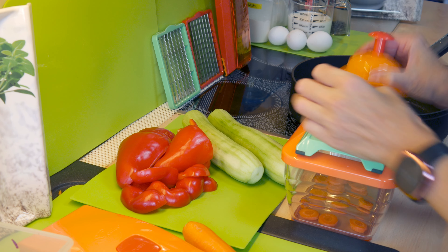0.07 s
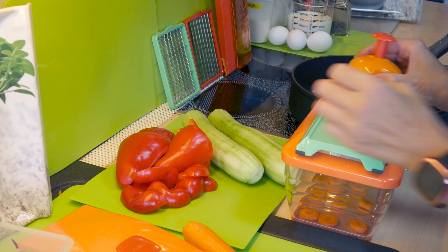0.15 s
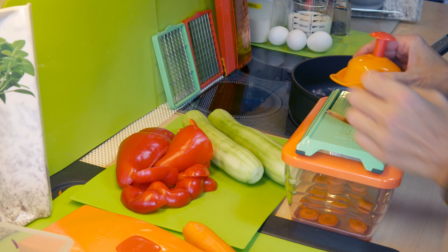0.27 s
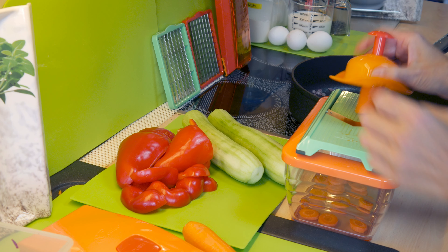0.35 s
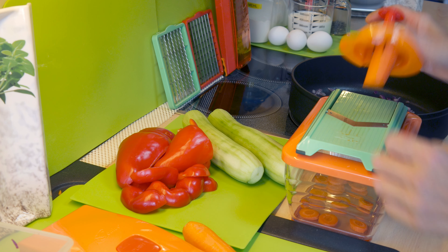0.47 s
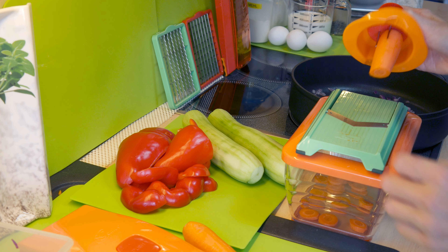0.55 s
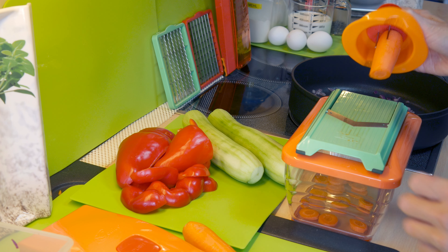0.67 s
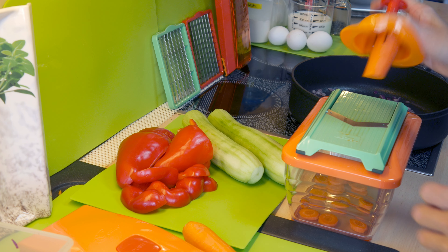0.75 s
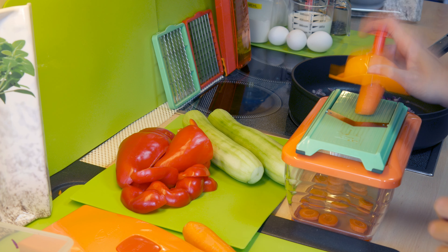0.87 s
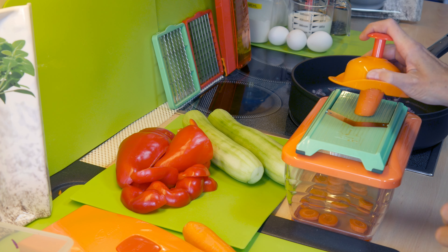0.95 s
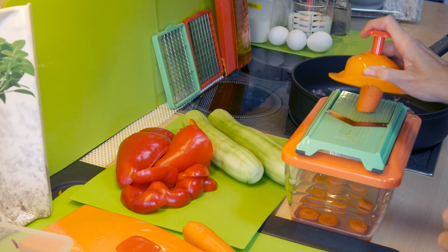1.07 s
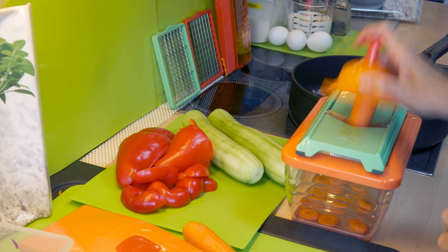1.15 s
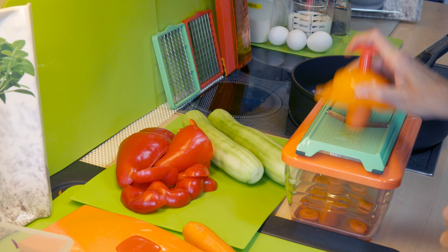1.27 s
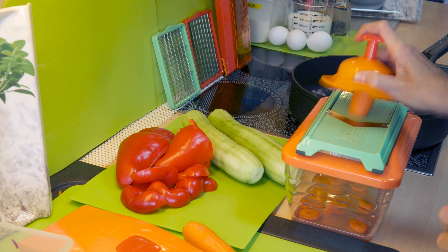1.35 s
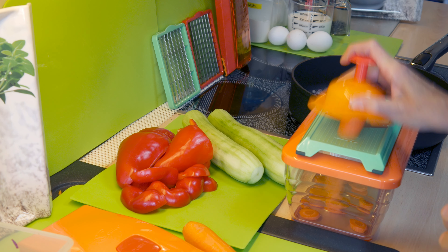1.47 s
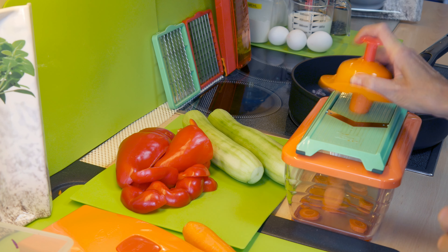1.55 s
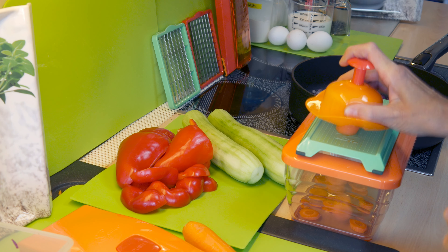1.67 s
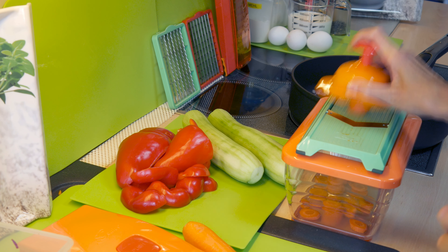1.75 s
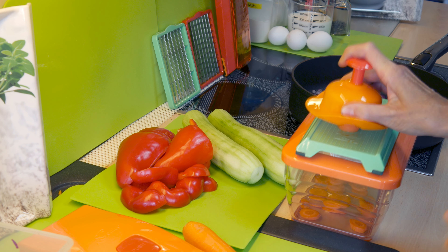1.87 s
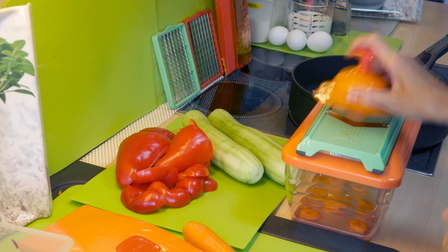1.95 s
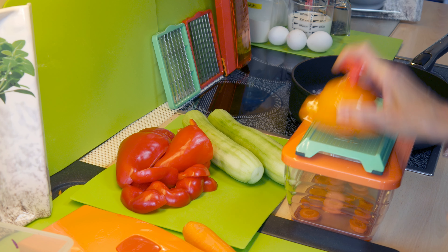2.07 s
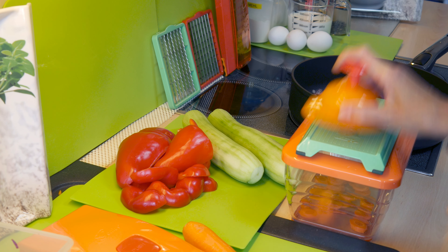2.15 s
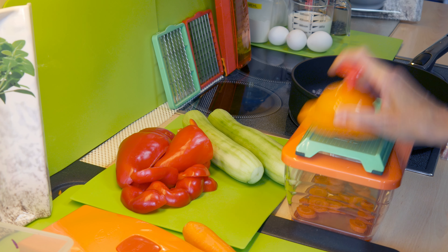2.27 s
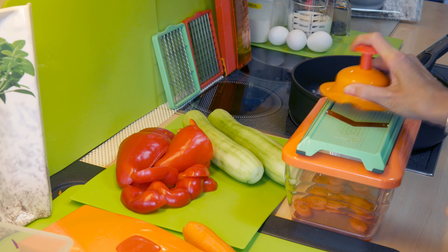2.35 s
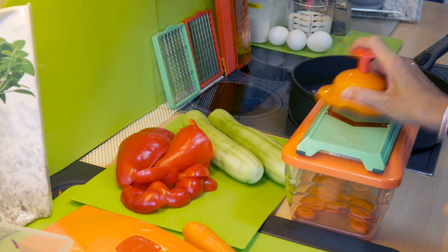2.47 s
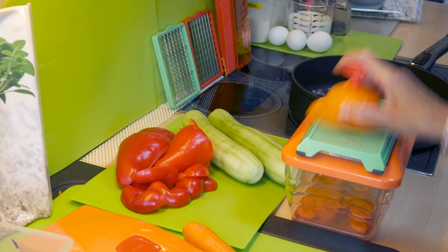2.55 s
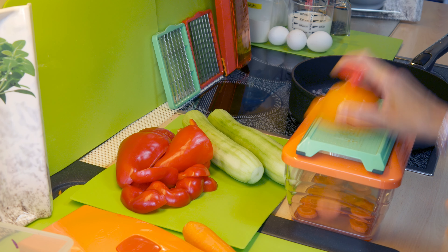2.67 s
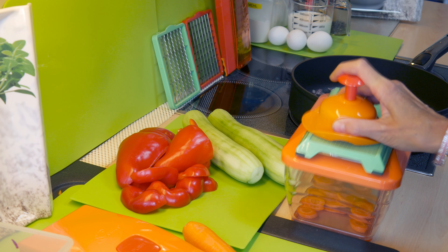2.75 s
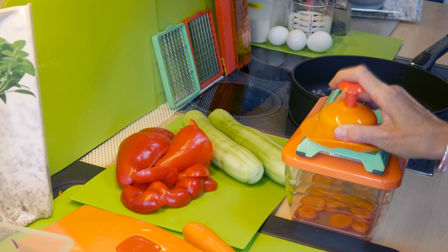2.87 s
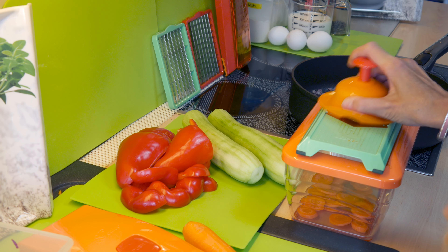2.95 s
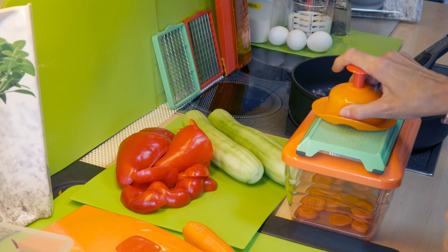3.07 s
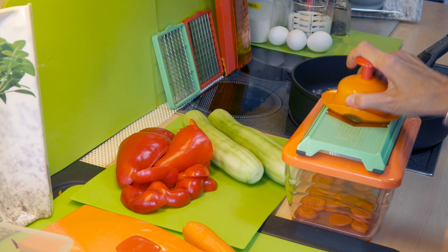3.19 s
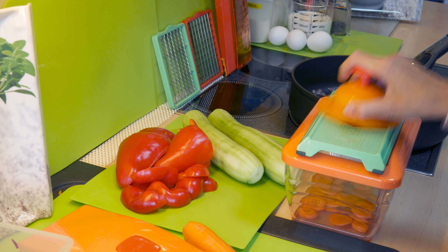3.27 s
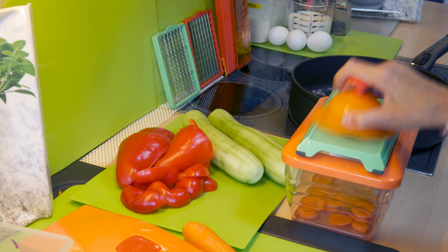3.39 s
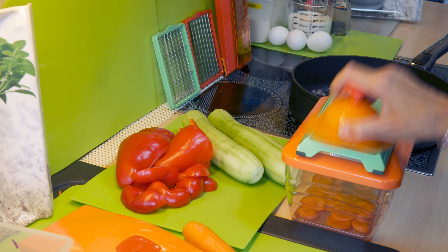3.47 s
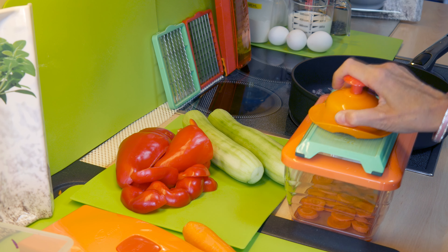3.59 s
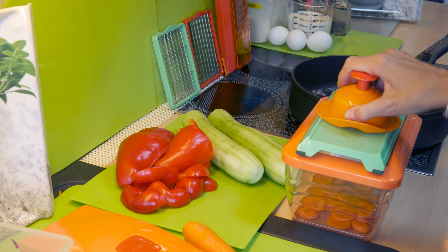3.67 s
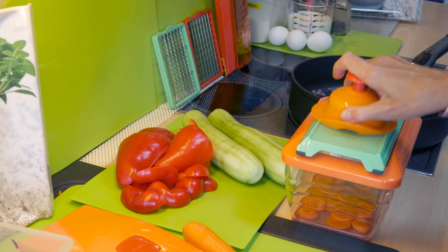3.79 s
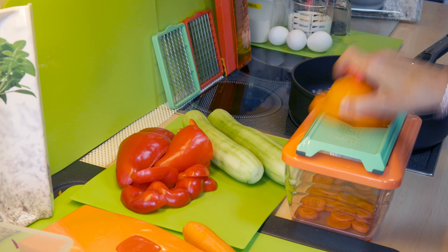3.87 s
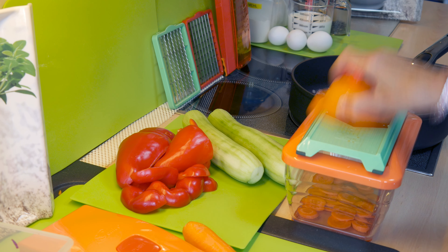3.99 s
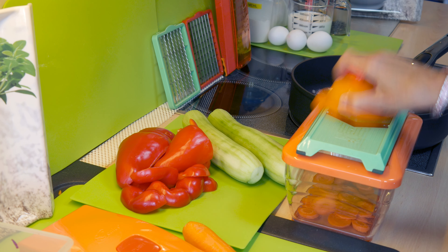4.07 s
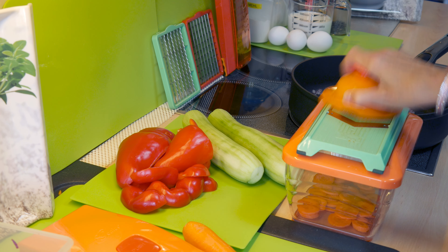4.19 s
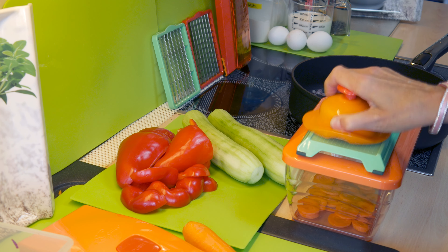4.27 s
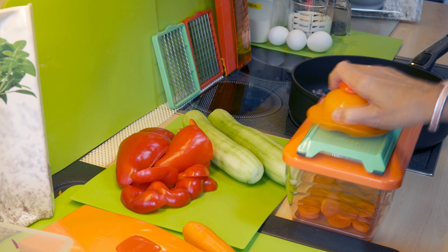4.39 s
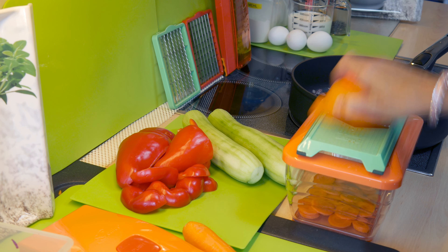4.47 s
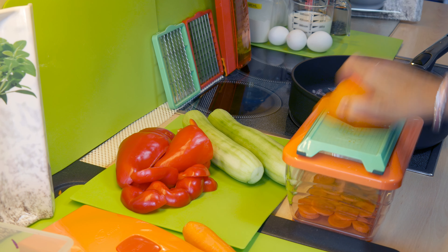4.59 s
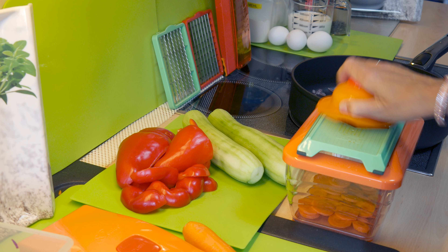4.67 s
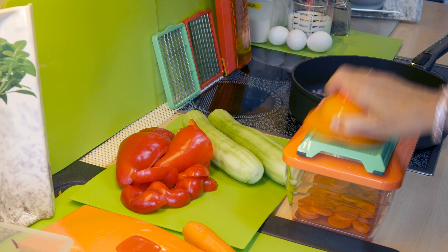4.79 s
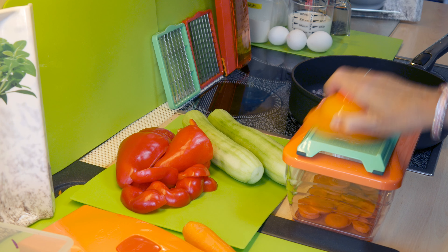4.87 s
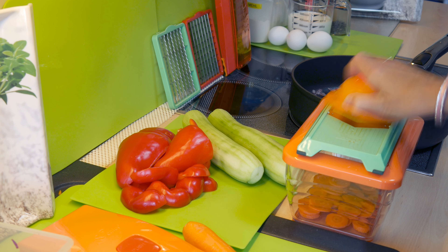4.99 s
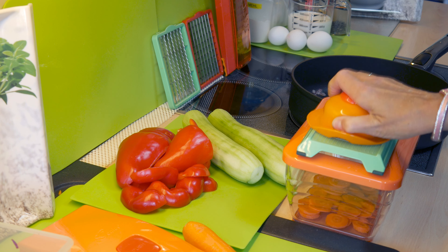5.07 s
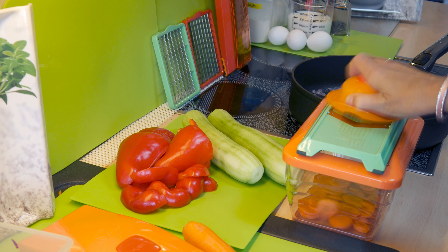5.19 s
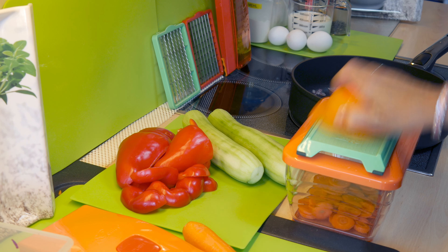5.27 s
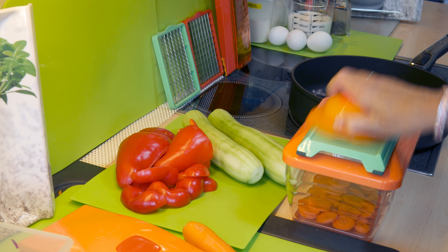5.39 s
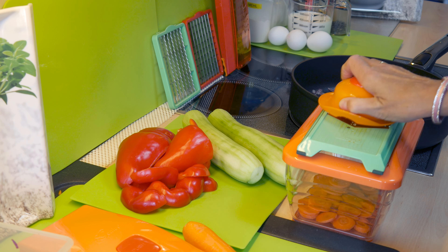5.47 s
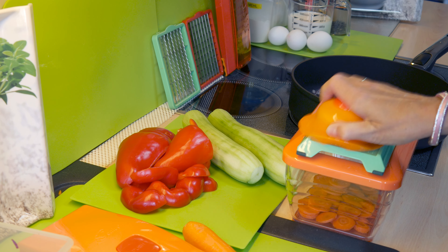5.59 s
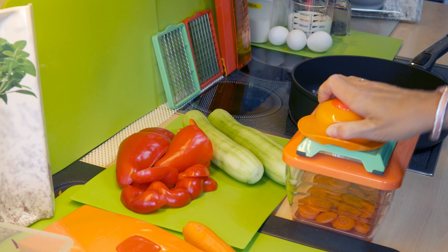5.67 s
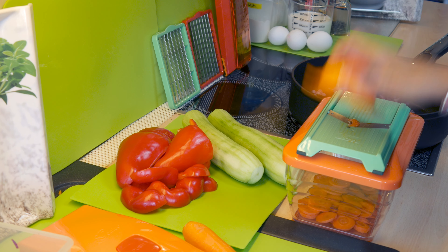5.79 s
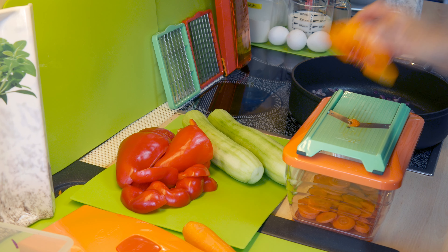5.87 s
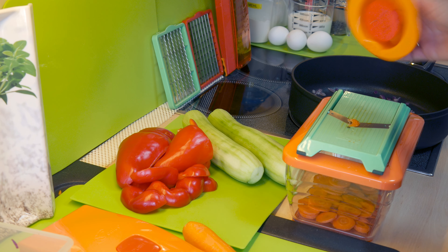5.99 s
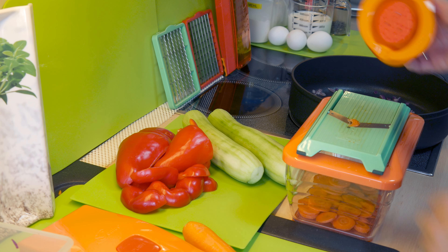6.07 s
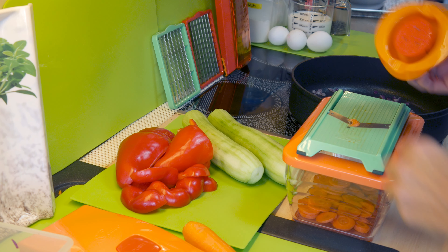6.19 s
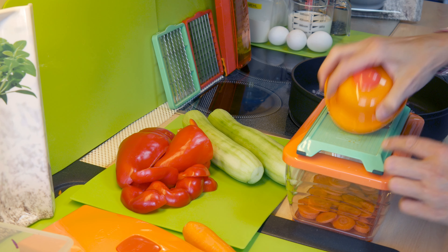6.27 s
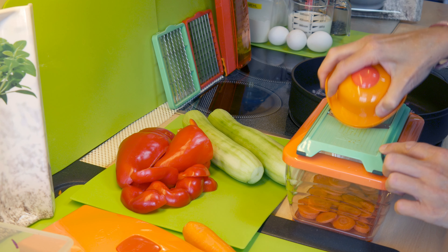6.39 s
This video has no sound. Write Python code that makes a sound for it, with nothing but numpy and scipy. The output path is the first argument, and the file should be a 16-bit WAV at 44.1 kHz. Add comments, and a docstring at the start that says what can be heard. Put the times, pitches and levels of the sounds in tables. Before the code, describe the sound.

Steady hiss and a short room reverberation surround a carrot being sliced by hand on plastic. After loose knocks come five strong cuts, crisp at the blade and booming in the box, with little wet squeaks. Then quick back-and-forth rasps turn duller and more spread out, with bumps between them. The strokes thin out; hard plastic rattles, and the holder knocks down again at the end.

```python
"""A carrot in a plastic holder is pushed to and fro over a mandoline on a plastic box, in a small kitchen.
Filtered grain noise makes each pass rasp at the blade; after a hard stroke a bright burst snaps the slice off.
The sled rubs, bumps and squeaks, and moving resonances make the hollow box boom; hard parts clack early and late.
Five hard strokes give way to quicker ones as the stub wears down, over a steady hiss.
During most of the quick strokes the middle of the stereo image is turned down: they sound softer and wider."""
import sys
import numpy as np
from scipy import signal
from scipy.fft import rfft, irfft
from scipy.io import wavfile
from scipy.ndimage import uniform_filter1d

SR = 44100
rng = np.random.default_rng(int(sys.argv[2]) if len(sys.argv) > 2 else 0)


def generate_wav(signal):
    """Clip the signal to [-1, 1] and save it as 16-bit WAV at the path in sys.argv[1]."""
    frames = np.transpose(np.atleast_2d(signal))
    scaled = np.clip(frames, -1, 1) * 32767
    pcm = np.round(scaled).astype(np.int16)
    wavfile.write(sys.argv[1], SR, pcm)


N = 283871
T = np.arange(N) / SR
SHORT = T[:SR // 2]  # time axis of a single event [s]


def amp(db):
    """Level to gain: 20 dB is a factor of ten in amplitude."""
    return 10 ** (np.asarray(db) / 20)


def evened(x):
    """Normalization by mean power: scales to rms 1."""
    return x / np.sqrt(np.mean(x ** 2) + 1e-20)


def peaked(x):
    """Normalization by short-time power: the loudest hundredth of a second gets rms 1."""
    power = uniform_filter1d(x ** 2, size=441)
    return x / np.sqrt(power.max() + 1e-20)


def read(points, hz):
    """Logarithmic frequency scale: interpolates a spectrum along log frequency."""
    f, value = np.transpose(points)
    return np.interp(np.log(hz + 1), np.log(f + 1), value)


def curves(rows):
    """Linear interpolation: each column of a time table, sample by sample."""
    s, *columns = np.transpose(rows)
    return [np.interp(T, s, c) for c in columns]


def add(mix, s, sound):
    """Superposition: mixes a sound in at time s."""
    part = mix[max(round(s * SR), 0):][:len(sound)]
    part += sound[:len(part)]


def response(spectrum, peaks=(), size=8192):
    """Minimum phase: a causal impulse response from a broad spectrum with resonances on top, by the cepstrum."""
    hz = np.fft.rfftfreq(size, 1 / SR)
    lift = 1 + sum((amp(db) ** 2 - 1) / (1 + (2 * (hz - f) / width) ** 2) for f, width, db in peaks)
    log_gain = np.log(amp(read(spectrum, hz))) + np.log(np.maximum(lift, 1e-2)) / 2
    cepstrum = irfft(log_gain)
    # fold the cepstrum onto positive time
    cepstrum[1:size // 2] *= 2
    cepstrum[size // 2 + 1:] = 0
    return irfft(np.exp(rfft(cepstrum)))[:size // 2]


def through(x, ring):
    """Linear filtering: convolves x with an impulse response."""
    return signal.oaconvolve(x, ring)[:len(x)]


def resonate(x, hz, width_hz):
    """Resonance by heterodyning: a one-pole smoother around a centre frequency that may move, gain 1 at its peak."""
    turn = np.exp(2j * np.pi * np.cumsum(hz * np.ones(N)) / SR)
    r = np.exp(-np.pi * width_hz / SR)
    return 2 * (turn * signal.lfilter([1 - r], [1, -r], x / turn + 1e-18)).real


def grains(count, per_s, spread_db):
    """Shot noise: random tiny fractures or slips of uneven size, rms 1."""
    size_db = spread_db * np.minimum(rng.exponential(1, count), 4)
    present = rng.random(count) < per_s / SR
    return evened(rng.standard_normal(count) * amp(size_db) * present)


def burst(rise, t60):
    """Impact transient: a quick flurry of contacts swells and dies exponentially."""
    flurry = grains(len(SHORT), per_s=9000, spread_db=-5.0)
    return flurry * (1 - np.exp(-SHORT / rise)) * amp(-60 * SHORT / t60)


def travelling(x, depth=1.0, delay=0.001228, swing=0.509, strokes_hz=4.4):
    """Comb interference: the contact moves along the plate, so the delay of its edge echo sways and colours the sound."""
    lag = delay * (1 + swing * np.sin(2 * np.pi * (strokes_hz * T + rng.random())))
    return (x + depth * np.interp(T - lag, T, x)) / np.sqrt(1 + depth ** 2)


HISS_DB = -43.5  # rms of the middle and reference for the sides, before the image is altered
# relative spectral density of the hiss: (frequency [Hz], level [dB])
HISS_SPECTRUM = [(18, -61), (30, -37), (86, -11), (141, -15), (645, -8), (981, -7.5), (1240, -9.5),
                 (1340, -8.5), (2660, -6), (2950, -4.5), (3360, -4.5), (6650, -2.5), (13200, -9),
                 (15800, -27)]
# sides of the hiss against its middle: (frequency [Hz], level [dB])
HISS_SIDE_SPECTRUM = [(60, -5), (180, 7), (550, -1), (1650, -5.5), (4970, -10), (15000, -6)]


def hiss():
    """Partial coherence: smooth, bright noise whose common middle is shared by both channels."""
    mid, side = (evened(through(v, response(HISS_SPECTRUM))) for v in rng.standard_normal((2, N)))
    side = through(side, response(HISS_SIDE_SPECTRUM))
    return amp(HISS_DB) * np.array([mid + side, mid - side])


ROOM_TAIL_DB, ROOM_SIDE_DB = -13.5, -21  # tail gains in the middle and in the sides
# reverberation time of the kitchen: (frequency [Hz], t60 [s])
ROOM_DECAY = [(100, 0.71), (400, 0.43), (1800, 0.58), (5000, 0.58), (14000, 0.044)]
# early echoes from worktop, wall and hob, by how they differ between the ears: (delay [s], relative gain [1])
EARLY_ECHOES = [(.0007, 0.15), (.0021, 0.1), (.0033, 0.083), (.0052, -.13), (.0074, 0.1), (.0101, -0.1),
                (.0137, 0.079), (.0178, 0.0025)]


def kitchen(x, echo_db=-9):
    """Room reverberation: early echoes widen the sound, then middle and sides each decay in a short tail."""
    noise = rng.standard_normal((2, len(SHORT))) * (SHORT > .008)
    hz, t, z = signal.stft(noise, SR, nperseg=256)
    decay = amp(-60 * t / read(ROOM_DECAY, hz)[:, None])
    tail = signal.istft(z * decay, SR, nperseg=256)[1]
    tail = tail / np.linalg.norm(tail[0])
    early = sum(gain * np.pad(x, (abs(round(delay * SR)), 0))[:N] for delay, gain in EARLY_ECHOES)
    mid = x + amp(ROOM_TAIL_DB) * through(x, tail[0])
    side = amp(echo_db) * early + amp(ROOM_SIDE_DB) * through(x, tail[1])
    return np.array([mid + side, mid - side])


# hard plastic parts clack and ring:
# (time [s], relative shell level [dB], relative plunger level [dB], chatter against contact [dB], chatter t60 [s])
CLACK_EVENTS = [(.147, -14.5, -50, 0.5, 0.32), (5.483, -50, -21, -2, 0.36)]
# broad response of the plastic: (frequency [Hz], level [dB])
PLASTIC_SPECTRUM = [(100, -49), (400, -12), (1500, -1.5), (2500, -4.5), (4500, -2.5), (7000, -5),
                    (10000, -12.5), (15500, -27)]
# modes of the holder's shell and of its plunger: (frequency [Hz], width [Hz], height above the broad response [dB])
SHELL_MODES = [(568, 35, 24.5), (1240, 97, 16.5), (1400, 80, 12), (1540, 75, 15), (1700, 71, 19.5),
               (1800, 130, 20), (3900, 570, 6)]
PLUNGER_MODES = [(1040, 70, 8), (3359, 170, 13), (4371, 190, 17), (5000, 300, 12), (5701, 240, 21),
                 (6250, 220, 19), (6804, 200, 21), (7300, 300, 15), (9281, 700, 16)]


def clacks():
    """Modal excitation: a sharp contact and its dense, dying chatter ring the holder's shell and plunger."""
    out = np.zeros(N)
    for s, shell_db, plunger_db, chatter_db, chatter_t60 in CLACK_EVENTS:
        for db, modes in ((shell_db, SHELL_MODES), (plunger_db, PLUNGER_MODES)):
            ring = response(PLASTIC_SPECTRUM, modes)
            contact = peaked(through(burst(rise=0.00069, t60=0.1), ring))
            rattling = evened(through(grains(len(SHORT), per_s=5300, spread_db=-3.5), ring))
            chatter = rattling * amp(-60 * SHORT / chatter_t60)
            add(out, s, amp(db - 1.5) * (contact + amp(chatter_db) * chatter))
    return out


# wet carrot sticks and slips on the plastic:
# (time [s], length [s], mean pitch [Hz], starting level [dB], fall over the length [dB])
SQUEAK_EVENTS = [(1.331, 0.081, 970, -23, 5), (1.761, 0.08, 968, -25, 5), (2.041, 0.044, 956, -26.5, 0),
                 (4.595, 0.021, 1000, -22.5, -7), (4.707, 0.025, 966, -16, 8),
                 (4.9375, 0.0088, 980, -10.5, 4.5), (4.946, 0.045, 963, -19.5, 7.5)]


def squeaks(jitter=0.015, flutter=0.48, overtone_db=-10):
    """Stick-slip oscillation: friction locks near the plate's strongest mode, a short, rough tone with overtones."""
    out = np.zeros(N)
    for s, length, hz, db, fall_db in SQUEAK_EVENTS:
        waver, shake = (evened(uniform_filter1d(v, size=120)) for v in rng.standard_normal((2, len(SHORT))))
        phase = 2 * np.pi * np.cumsum(hz * (1 + jitter * waver)) / SR
        tone = sum(amp(overtone_db * k) * np.sin((k + 1) * phase) for k in range(3))
        gate = np.clip(np.minimum(SHORT / .002, (length - SHORT) / .004 + 1), 0, 1)
        level = amp(db - fall_db * np.minimum(SHORT / length, 1))
        add(out, s, level * gate * evened(tone * (1 + flutter * shake)))
    return out


# how far the holder covers the slot as the stub wears down: (time [s], covered share [0-1])
SLOT_COVER = [(2.9, 0), (3.4, 0.6), (4.3, .9), (5, 0.84), (5.6, 0.05)]
# slot open and covered: (pitch of the air in the box [Hz], its ring [dB], ring of the lid [dB])
SLOT_OPEN, SLOT_COVERED = (379, 2.6, -6), (420, -9.5, 2.6)
LID_HZ, LID_WIDTH_HZ = 189, 33


def cavity(x, air_width_hz=13):
    """Cavity resonance: the air rings at one hollow note; covering the slot shifts and damps it, and drives the lid."""
    cover = np.clip(curves(SLOT_COVER)[0], 0, 1)
    hz, air_db, lid_db = (a + (b - a) * cover for a, b in zip(SLOT_OPEN, SLOT_COVERED))
    air = resonate(x * amp(air_db), hz, air_width_hz)
    lid = resonate(x * amp(lid_db), LID_HZ, LID_WIDTH_HZ)
    return air + lid


# the sled catches and bumps the box: (time [s], relative peak level [dB], plate against the boom [dB])
BUMP_EVENTS = [(1.522, -10.5, 3), (1.966, -7, -6.5), (2.175, -9.5, -2.5), (2.215, -4.5, -9.5),
               (2.847, -2, -10), (3.454, -5, -10), (3.994, -3.5, -11.5), (4.24, 1, -13), (4.598, -7.5, -20),
               (4.715, -6, -12), (5.229, -17.5, -1.5)]
# hard strokes through the long carrot, also played by the slide, cracks and cuts; levels are relative:
# (time [s], bite [dB], bite length [s], delay until the slice snaps off [s], snap [dB],
#  boom of the rub [dB], plate of the rub [dB])
LONG_CARROT_STROKES = [(1.223, -15, 0.039, 0.14, -10.5, -24.5, -24),
                       (1.456, -16, 0.018, 0.14, -10, -24, -25), (1.6823, -20.5, 0.039, 0.12, -8, -27, -27),
                       (1.9042, -21, .036, .112, -10.5, -28.5, -35),
                       (2.119, -14, 0.0069, 0.13, -11, -27, -25.5)]


def sled_blows(bite_lag=.006, bite_db=2, bite_plate_db=-5,
               lurch_lag=.013, lurch_db=-4, lurch_plate_db=-14, bass_db=-21):
    """Momentum transfer: a hard stroke jolts the box at the bite and as the sled lurches free; (s, dB, bass dB, plate dB)."""
    rows = [(s, db, bass_db, plate_db) for s, db, plate_db in BUMP_EVENTS]
    for s, db, _, delay, *_ in LONG_CARROT_STROKES:
        rows.append((s + bite_lag, db + bite_db, bass_db, bite_plate_db))
        rows.append((s + delay + lurch_lag, lurch_db, bass_db, lurch_plate_db))
    return rows


CREST_S = .04  # a blow's build-up before its crest


def push(swell, t60):
    """Cushioned impact: contacts build up to the crest, then die exponentially."""
    t = SHORT - CREST_S
    shape = np.where(t < 0, np.exp(-np.abs(t / swell) ** 1.16), amp(-60 * np.maximum(t, 0) / t60))
    return grains(len(SHORT), per_s=11000, spread_db=0.5) * shape


# the holder knocks the box while no hand presses on it:
# (time [s], relative peak level [dB], bass against the boom [dB], plate against the boom [dB])
FREE_KNOCKS = [(.109, -20, -27, -3), (.139, -17, -34, 1), (.151, -12, -14, -28), (.427, -22.5, -35, 0),
               (.948, -8.5, -5.5, -3), (.974, -14.5, -33, -1), (6.371, -13.5, -23, -8),
               (6.394, -18, -25, -1.5)]
# broad responses of the box, low to high, and of its plate: (frequency [Hz], level [dB])
BASS_SPECTRUM = [(20, -34), (55, -9), (110, -0.5), (170, -7.5), (240, -9), (400, -51), (1000, -93.5)]
BOOM_SPECTRUM = [(60, -40), (150, -20), (210, -17), (300, -2), (380, 7), (480, -2.5), (640, -7), (900, -32),
                 (2000, -74.5)]
PLATE_SPECTRUM = [(200, -53), (550, -8), (760, 3.5), (1100, -1), (1700, -3.5), (2400, -9.5), (3300, -12.5),
                  (6000, -15), (15000, -38)]
# modes of the box and its plate: (frequency [Hz], width [Hz], height above the broad response [dB])
BOX_MODES = [(122, 45, 5), (222, 40, 7), (333, 22, 3), (420, 22, 3), (550, 22, 7), (694, 26, 6),
             (785, 16, 7), (963, 28, 11), (1036, 30, 8), (1194, 32, 6), (1267, 22, 6), (1390, 16, 6),
             (1448, 16, 7), (1680, 30, 5), (1808, 25, 9), (2260, 60, 6), (2580, 38, 7), (2788, 18, 7),
             (3170, 50, 4), (3840, 60, 5)]


def bumps(boom_db=-10, bass_db=-10, rattle_db=-11, held_swell=0.0064, free_swell=0.0035, free_db=-11, free_t60=0.37):
    """Damped impact: blows are cushioned under the hand, sharp and rattling without it; returns low boom and plate rattle."""
    low, high = np.zeros((2, N))
    bass, boom, plate = (response(part, BOX_MODES) for part in (BASS_SPECTRUM, BOOM_SPECTRUM, PLATE_SPECTRUM))
    for rows, swell, looseness in ((sled_blows(), held_swell, 0), (FREE_KNOCKS, free_swell, amp(free_db))):
        for s, db, low_db, plate_db in rows:
            rattle = looseness * push(swell, free_t60)
            start = s - CREST_S
            boom_hit = peaked(through(push(swell, t60=0.058) + rattle, boom))
            bass_hit = peaked(through(push(swell, t60=0.042), bass))
            plate_hit = peaked(through(push(swell, t60=0.19) + rattle, plate))
            add(low, start, amp(db + boom_db) * boom_hit)
            add(low, start, amp(db + low_db + bass_db) * bass_hit)
            add(high, start, amp(db + plate_db + rattle_db) * plate_hit)
    return low, high


def rub(length, attack=0.02, release=0.017, coast_db=-19, coast=0.039):
    """Kinetic friction: it grows as the sled speeds up, holds, drops, and coasts out faintly."""
    after = np.maximum(SHORT - length, 0)
    return np.minimum(SHORT / attack, 1) * (np.exp(-after / release) + amp(coast_db) * np.exp(-after / coast))


# the sled slides without cutting: (time [s], length [s], relative boom [dB], relative plate [dB])
GLIDE_EVENTS = [(1.13, .09, -47, -62), (2.353, .065, -18, -19), (2.907, 0.028, -26, -24.5),
                (2.98, 0.04, -41, -40), (3.217, 0.05, -43, -40), (3.602, 0.063, -29, -28.5),
                (3.881, 0.052, -33.5, -36.5), (4.767, 0.051, -29.5, -32), (4.932, 0.11, -29.5, -26.5),
                (5.213, 0.075, -27.5, -30.5), (5.418, 0.2, -36, -36.5), (5.687, 0.1, -50, -48)]
# quick strokes through the stub, also played by the cuts; levels are relative:
# (time [s], bite [dB], bite length [s], rub length [s], boom [dB], plate [dB])
STUB_STROKES = [ (2.319, -16.5, 0.049, .03, -19, -30), (2.4505, -15.5, 0.032, 0.053, -18, -25),
                (2.507, -16.5, 0.026, 0.038, -20.5, -20), (2.572, -13.5, 0.025, 0.069, -16.5, -22.5),
                (2.627, -16, .021, .02, -15.5, -19), (2.6885, -17, 0.018, 0.058, -21.5, -25),
                (2.747, -13.5, 0.02, .03, -18, -19), (2.8005, -19.5, 0.044, 0.076, -23, -25),
                (3.2918, -15.5, 0.022, 0.057, -17, -20), (3.4204, -15.5, .021, 0.046, -19.5, -23.5),
                (3.523, -26, 0.018, 0.031, -25, -23), (3.647, -19, 0.038, 0.061, -18.5, -22),
                (3.954, -18, 0.035, 0.059, -18, -24.5), (4.076, -16.5, 0.022, 0.044, -21.5, -20.5),
                (4.135, -12.5, 0.024, 0.03, -18.5, -23.5), (4.193, -17.5, .021, 0.048, -22.5, -23.5),
                (4.32, -15.5, 0.023, 0.052, -23.5, -26.5), (4.375, -16, .021, 0.025, -20, -19),
                (4.4305, -15.5, .03, .07, -21, -20.5), (4.558, -20.5, .033, 0.058, -24, -26),
                (4.616, -22, .023, 0.043, -27, -26.5), (4.6758, -17, 0.041, 0.051, -22.5, -23),
                (4.843, -18.5, 0.021, 0.081, -25.5, -30), (5.099, -21.5, .033, 0.065, -27.5, -31.5),
                (5.338, -23.5, 0.044, 0.041, -23.5, -26), (5.609, -26.5, .01, .05, -28, -32.5)]


def slide(bass_db=-26, overrun=0.069, chatter_rise_db=-7):
    """Frictional excitation: slips under the sled shake box and plate, powers adding; returns both."""
    low_power, high_power = np.zeros((2, N))
    for s, _, _, delay, _, boom_db, plate_db in LONG_CARROT_STROKES:
        # the plate chatters more as the blade goes deeper; the sled runs on a little after the snap
        force = rub(delay + overrun, attack=0.009)
        depth = np.minimum(SHORT / delay, 1)
        add(low_power, s, (amp(boom_db) * force) ** 2)
        add(high_power, s, (amp(plate_db + chatter_rise_db * (1.5 - depth)) * force) ** 2)
    for s, *_, length, boom_db, plate_db in STUB_STROKES + GLIDE_EVENTS:
        add(low_power, s, (amp(boom_db) * rub(length)) ** 2)
        add(high_power, s, (amp(plate_db) * rub(length)) ** 2)
    slips = grains(N, per_s=2000, spread_db=1.5)
    bass, boom, plate = (evened(through(slips, response(part, BOX_MODES)))
                         for part in (BASS_SPECTRUM, BOOM_SPECTRUM, PLATE_SPECTRUM))
    low = np.sqrt(low_power) * (boom + amp(bass_db) * bass)
    high = np.sqrt(high_power) * travelling(plate)
    return low, high


# sharp contacts of the holder on the plate:
# (time [s], relative peak level [dB], relative plate rattle against the crack [dB])
CRACK_EVENTS = [(0.146, -23, -23), (0.4259, -28, 6.5), (0.9438, -17, 7.5), (2.2065, -19, 6.5),
                (4.9375, -32.5, 16), (4.9876, -15, -17), (5.222, -35, 7), (5.485, -16.5, -18),
                (6.3627, -13.5, -6)]
# broad spectrum of a snap: (frequency [Hz], level [dB])
CRACK_SPECTRUM = [(500, -58.5), (1800, 9), (2700, 6.5), (4000, 10), (6000, 1), (9000, -0.5), (12000, -3),
                  (15500, -27)]


def cracks(crack_db=-11, rattle_db=-13, slice_rattle_db=1):
    """Impulsive excitation: a bright snap sets the plate rattling as a slice breaks off or the holder lands."""
    out = np.zeros(N)
    bright, plate = response(CRACK_SPECTRUM), response(PLATE_SPECTRUM, BOX_MODES)
    slices = [(s + delay, snap_db, slice_rattle_db) for s, _, _, delay, snap_db, _, _ in LONG_CARROT_STROKES]
    for s, db, plate_db in slices + CRACK_EVENTS:
        snap = amp(crack_db) * peaked(through(burst(rise=0.0035, t60=0.096), bright))
        rattle = amp(rattle_db + plate_db) * peaked(through(burst(rise=0.002, t60=0.14), plate))
        add(out, s, amp(db) * (snap + rattle))
    return out


def bite(db, length, rise, release=0.03):
    """Cutting force: it rises, holds while the edge is in the flesh, and lets go."""
    return amp(db) * np.minimum(SHORT / rise, 1) * np.exp(-np.maximum(SHORT - length, 0) / release)


# broad spectrum of the cut at the blade: (frequency [Hz], level [dB])
RASP_SPECTRUM = [(200, -37), (900, 0), (2000, -2), (3100, -3), (3900, 1.5), (5000, -1), (7000, -3),
                 (10000, -3), (12500, -9.5), (15500, -24)]


def cuts(rise=0.01, soft_rise=0.014, lead=0.0053, drag_db=-11, drag=.3, level_db=-11, thrust_db=-29, clump_db=0.7):
    """Brittle fracture: cells burst at the blade; a long carrot bites hard and drags on, the stub eases in."""
    force = np.zeros(N)
    for s, db, length, *_ in LONG_CARROT_STROKES:
        # the force drags on as the slice peels away
        fall = np.exp(-(np.maximum(SHORT - length, 0) / drag) ** 2)
        peel = amp(db + drag_db) * np.minimum(SHORT / rise, 1) * fall
        add(force, s, bite(db, length, rise) + peel)
    for s, db, length, *_ in STUB_STROKES:
        add(force, s - lead, bite(db, length, soft_rise))
    # the flesh gives way in small clumps of dense fractures
    clumps = amp(clump_db * evened(uniform_filter1d(rng.standard_normal(N), size=110)))
    fractures = clumps * grains(N, per_s=9000, spread_db=2.3)
    crunch = through(fractures, response(RASP_SPECTRUM, BOX_MODES))
    rasp = amp(level_db) * evened(travelling(crunch, depth=0.15, delay=0.00049))
    # the blade passes the same force on to the box
    thrust = amp(thrust_db) * evened(through(fractures, response(BASS_SPECTRUM, BOX_MODES)))
    return force * (rasp + thrust)


def slicer(rub_db=-2.0, rub_hum_db=3):
    """Coupled radiation: one face gives off every contact sound, and boom and rubbing keep the air in the box humming."""
    (bump_low, bump_high), (slide_low, slide_high) = bumps(), slide()
    body = bump_low + bump_high + amp(rub_db) * (slide_low + slide_high)
    hum = cavity(bump_low + amp(rub_db + rub_hum_db) * slide_low)
    return body + hum + cuts() + cracks() + squeaks() + clacks()


def scene(flank_db=-11.0):
    """Incoherent sources: the slicer's flanks shake out of step with its top and widen it, a little to the right."""
    top = slicer()
    flanks = amp(flank_db) * slicer()
    image = kitchen(top) + np.array([flanks, -flanks])
    return image * amp([[-.4], [.4]]) + hiss()


# the stretch with the middle turned down, which opens with a brief dip
WIDE_FROM_S, WIDE_UNTIL_S, WIDE_MID_DB = 2.306, 4.825, -8.5
EDGE_HZ = 15700  # upper band limit


def record(dry):
    """Mid-side balance: the level dips briefly and the middle stays down for a while, widening the image; then low-pass."""
    dip = 1 - .93 * np.exp(-((T - WIDE_FROM_S) / .006) ** 4)
    wide = np.clip(np.minimum((T - WIDE_FROM_S) / .004, (WIDE_UNTIL_S - T) / .02) + .5, 0, 1)
    mid = (dry[0] + dry[1]) / 2 * amp(WIDE_MID_DB * wide)
    side = (dry[0] - dry[1]) / 2
    image = dip * np.array([mid + side, mid - side])
    low_pass = signal.firwin(511, EDGE_HZ, window=("kaiser", 9), fs=SR)
    return signal.oaconvolve(image, low_pass[None], "same")


dry = scene()
out = record(dry)
generate_wav(out)
```